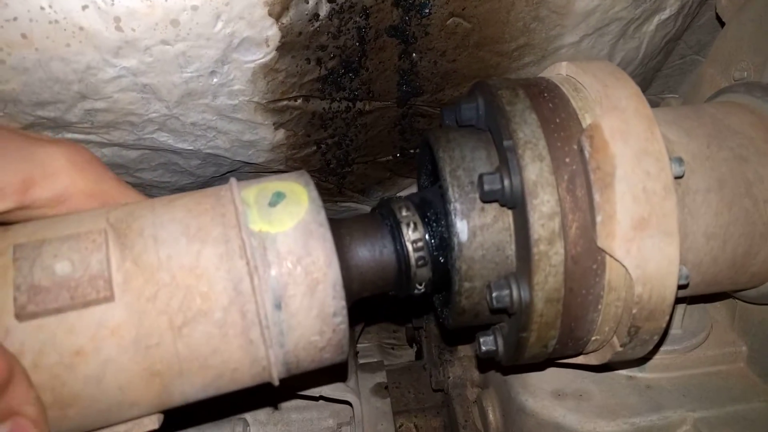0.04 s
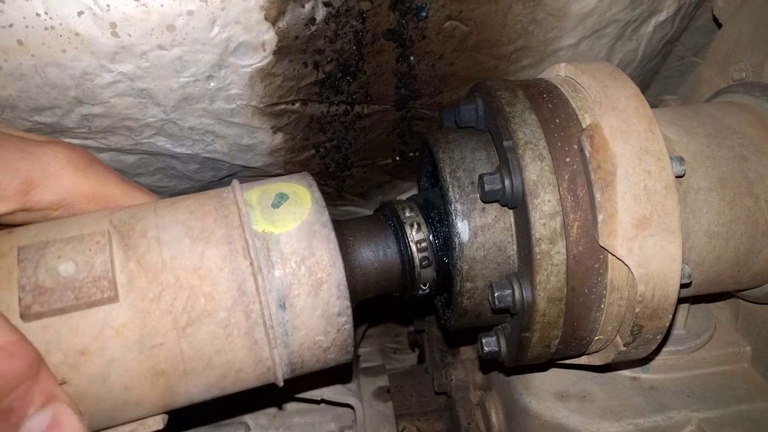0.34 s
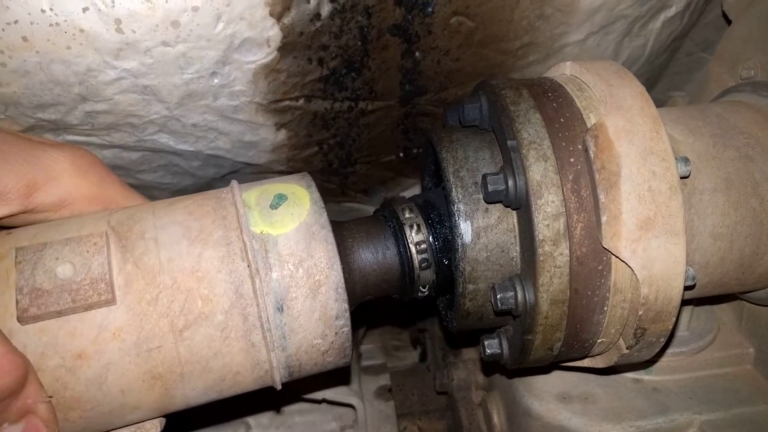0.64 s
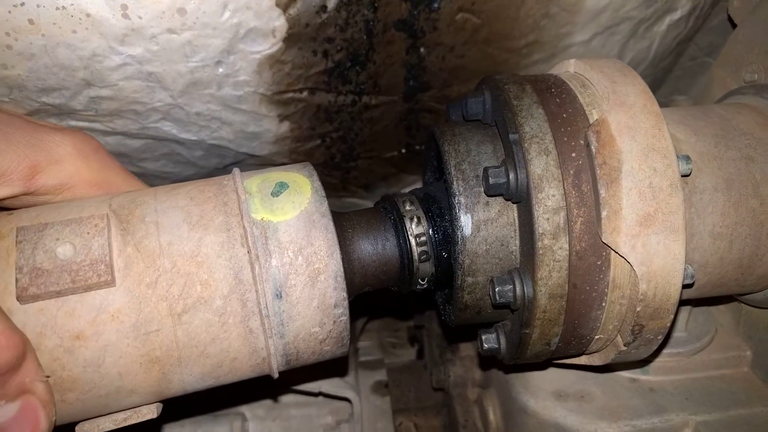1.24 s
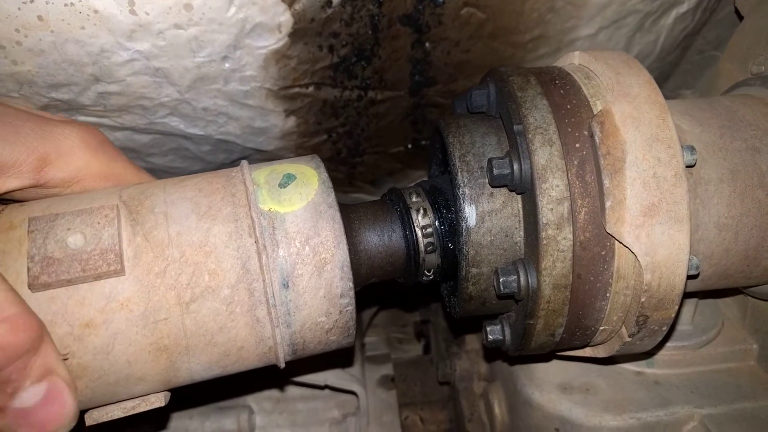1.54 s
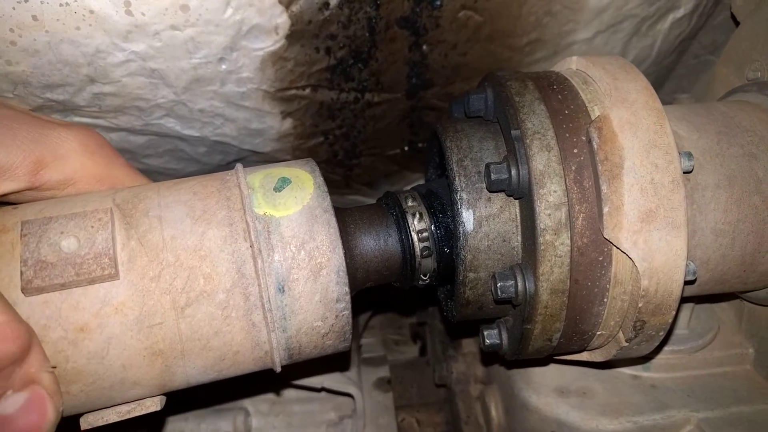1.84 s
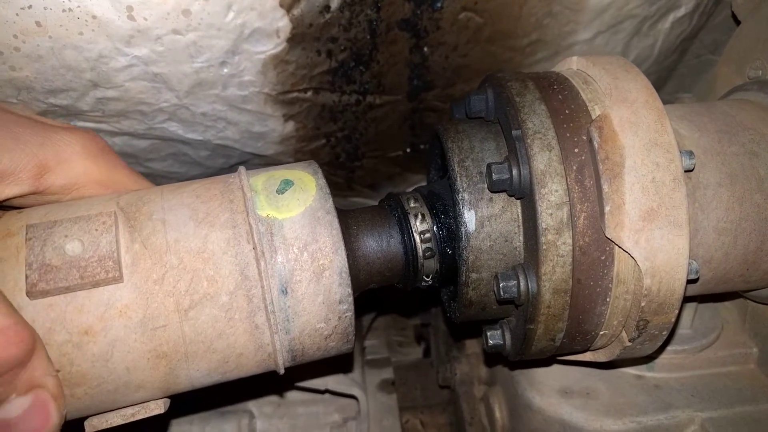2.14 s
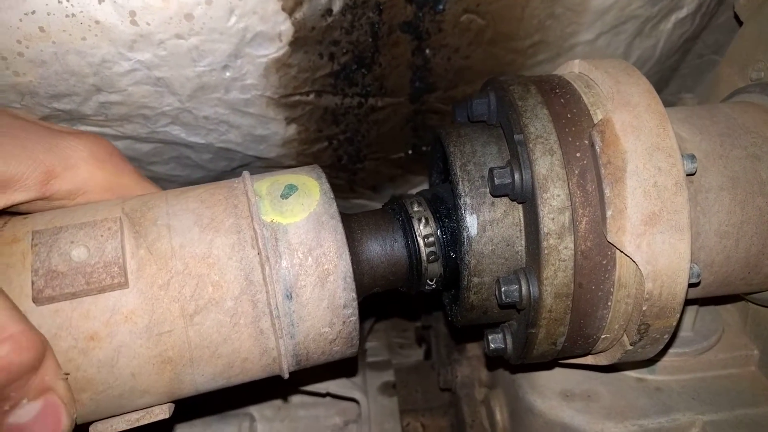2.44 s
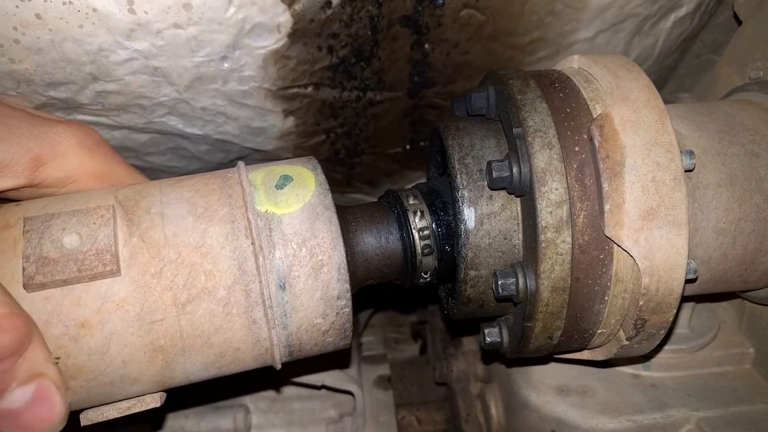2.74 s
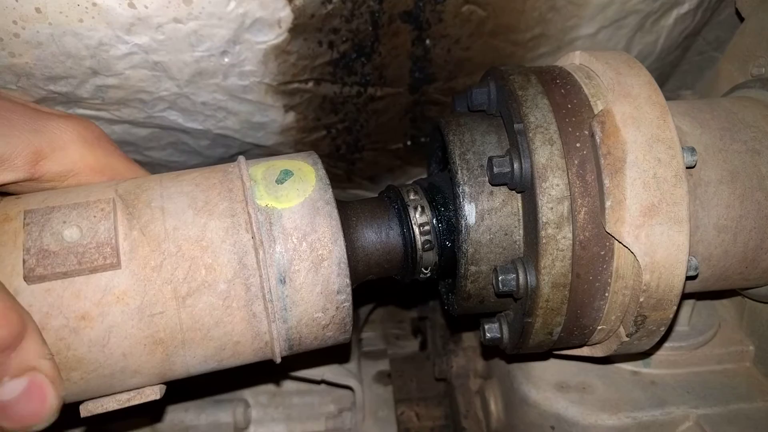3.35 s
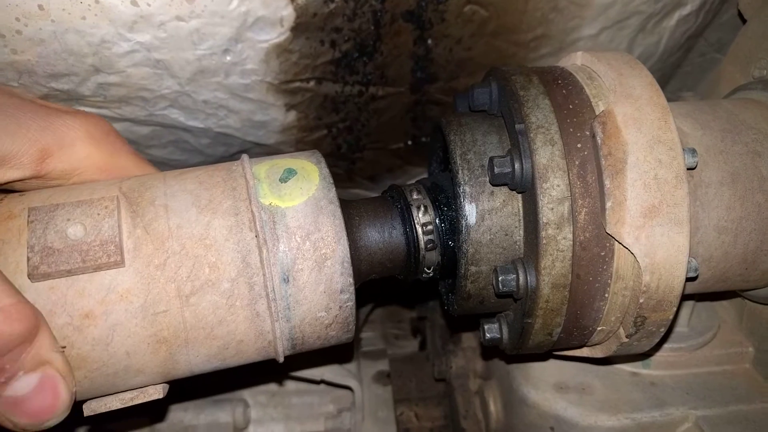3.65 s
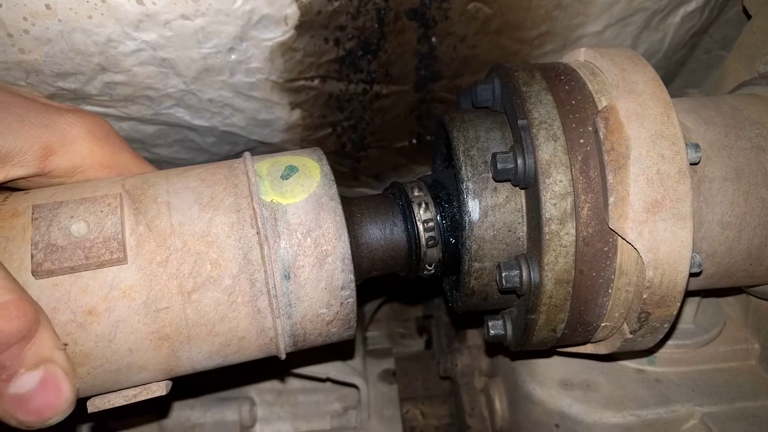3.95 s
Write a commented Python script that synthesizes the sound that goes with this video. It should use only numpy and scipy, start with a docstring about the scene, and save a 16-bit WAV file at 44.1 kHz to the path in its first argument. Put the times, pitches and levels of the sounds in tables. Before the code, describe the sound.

Regular sharp metal clunks and duller bumps from a loose shaft joint rocked under a vehicle.

```python
"""Under a vehicle in a quiet workshop, a low rumble and a soft hiss that swells and ebbs are heard throughout.
A hand pushes a drive shaft: its loose joint knocks free, scrapes through its play (the slack between
its parts) and clunks against the stop with a gritty chatter. On the way back it lands with a dull bump.
The hand rocks it six times; between the blows, skin brushes the tube and grit ticks in the joint."""
import sys
import numpy as np
from scipy import signal
from scipy.fft import rfft, irfft
from scipy.io import wavfile

SR = 44100
rng = np.random.default_rng(int(sys.argv[2]) if len(sys.argv) > 2 else 0)


def bounce(signal):
    """Save signal as a 16-bit WAV file at the path given by the first command-line argument."""
    frames = np.transpose(np.atleast_2d(signal))
    limited = np.clip(frames, -1, 1)
    pcm = np.round(limited * 32767).astype(np.int16)
    wavfile.write(sys.argv[1], SR, pcm)


N = 176400
T = np.arange(N) / SR

# Levels in all tables are relative: the functions add their own gains.
# the joint knocks free: t/s, level/dB, contact time/s, chatter level/dB
FREEING_KNOCKS = [(0.279, -2.5, 0.00013, -13), (0.977, -2, 0.000085, -8.5), (1.6142, -4, 0.00008, -10.5),
                  (2.2364, -2, 0.000048, -3), (2.8554, -3, 0.000065, -9.5), (3.4403, -3, 0.000045, -9)]
# it hits the stop: t/s, level/dB, contact time/s, chatter level/dB, chatter rise time/s
STOP_CLUNKS = [(0.3052, 1.5, 0.0002, 0.5, 0.00087), (1.0015, 0.5, 0.00024, 2.5, 0.00037),
               (1.6430, 1.5, 0.00018, -0.5, 0.0013), (2.2610, 2, 0.0001, -2, 0.0016),
               (2.8880, 2, 0.00011, -1.5, 0.0012), (3.4735, 1, 0.000097, -2.5, 0.0016)]
# it falls back: t/s, level/dB, level of the faint scrape as it settles/dB
RETURN_BUMPS = [(0.713, -10, -32), (1.301, -4.5, -29), (1.908, -2, -30), (2.531, 0, -26), (3.139, 0, -23),
                (3.713, -1, -24.5)]
# tone of the workshop's echoes: f/Hz, level/dB
WORKSHOP_TONE = [(90, -27), (250, -1), (700, -1.5), (1500, -9), (3000, -23), (8000, -21.5), (16000, -16)]
LIGHT_TOP_HZ = 10900  # light contacts are muffled above this


def from_db(db):
    """Turn decibels into a factor to multiply by."""
    return 10 ** (np.asarray(db) / 20)


def rms_one(x):
    """Scale a sound so that its average strength (rms) is 1."""
    return x / np.sqrt(np.mean(x ** 2) + 1e-20)


def keep_band(x, order, hz, kind):
    """Keep the "low", "high" or middle "band" part of a sound; a higher order cuts more steeply."""
    return signal.sosfilt(signal.butter(order, hz, kind, fs=SR, output="sos"), x)


def noise(spectrum, size=N):
    """Noise whose tone follows (f/Hz, level/dB) points and falls away below the first one."""
    hz, db = np.transpose(spectrum)
    bins = np.maximum(np.fft.rfftfreq(size, 1 / SR), 1)
    gain = from_db(np.interp(np.log(bins), np.log(hz), db)) * np.minimum(bins / hz[0], 1) ** 2
    return irfft(rfft(rng.standard_normal(size)) * gain, size)


def resonate(x, hz, width_hz):
    """A resonance: it lets through what lies near one pitch and weakens the rest."""
    r = np.exp(-np.pi * width_hz / SR)
    feedback = [1, -2 * r * np.cos(2 * np.pi * hz / SR), r * r]
    return signal.lfilter(np.array([1, 0, -1]) * (1 - r * r) / 2, feedback, x + 1e-18)


def ring(force, hz, t60):
    """A click starts a pure tone that fades by 60 dB in t60 seconds."""
    r = np.exp(-np.log(1000) / (t60 * SR))
    step = 2 * np.pi * hz / SR
    return signal.lfilter([0, np.sin(step)], [1, -2 * r * np.cos(step), r * r], force + 1e-18)


def burst(s, db, rise_s, fade_s):
    """A loudness curve that builds up to time s and fades after it."""
    distance = np.maximum((s - T) / rise_s, (T - s) / fade_s)
    return from_db(db) * np.exp(-np.minimum(distance, 30))


def echoes(spectrum, t60, build_s):
    """One second of dense echoes that build up and die away."""
    fade = np.exp(-np.log(1000) * T[:SR] / t60) * (1 - np.exp(-(T[:SR] / build_s) ** 2))
    return noise(spectrum, size=SR) * fade / np.sqrt(np.sum(fade ** 2))


def background():
    """A low rumble with a wavering hum, and a hiss that swells and ebbs."""
    # tone of the rumble and of the hiss: f/Hz, level/dB
    rumble_tone = [(25, -39), (33, -21.5), (46, 0), (115, 0.5), (190, -5.5), (300, -12), (480, -21),
                   (700, -20), (1200, -27), (3500, -36.5), (6500, -45.5), (7200, -25.5), (8600, -30),
                   (9800, -36.5), (11500, -37.5), (12800, -35), (15500, -38.5)]
    hiss_tone = [(300, 4.5), (1200, -10.5), (2500, -10.5), (5500, -7), (7200, 0), (8300, 4), (10000, -7),
                 (12000, -15.5), (16000, -17)]
    # the swells of the hiss: t/s, level/dB
    hiss_swells = [(0, -49), (0.08, -54.5), (0.15, -62), (0.25, -66), (0.37, -58), (0.48, -63.5),
                   (0.62, -59), (0.82, -61), (0.96, -68), (1.08, -58), (1.35, -58.5), (1.52, -64.5),
                   (1.72, -63), (1.99, -57), (2.15, -63), (2.47, -61), (2.6, -57), (2.83, -63.2),
                   (3.06, -63), (3.18, -60.5), (3.35, -65), (3.52, -62), (3.9, -65.5)]
    hum_hz, hum_width_hz = 109.4, 29
    low_noise = resonate(rng.standard_normal(N), hum_hz, hum_width_hz)
    hum = from_db(-68.5) * rms_one(resonate(low_noise, hum_hz, hum_width_hz))
    hiss_db = 1 + np.interp(T, *np.transpose(hiss_swells))
    hiss = from_db(hiss_db) * rms_one(noise(hiss_tone))
    rumble = from_db(-49) * rms_one(noise(rumble_tone))
    return rumble + hum + hiss


def workshop():
    """The echoes that the workshop throws back after a click."""
    return echoes(WORKSHOP_TONE, t60=0.89, build_s=0.0016)


def hand():
    """Skin brushes softly over the rusty tube, some strokes brighter than others."""
    # the hand shifts its grip: t/s, level/dB, half-length/s, brightness/(dB per octave)
    strokes = [(1.138, -61, 0.037, 0), (1.807, -62, 0.2, 1.5), (2.578, -61, 0.063, 6),
               (3.668, -59, 0.054, 0.5)]
    # tone of skin on rust: f/Hz, level/dB
    skin_tone = [(700, 11), (1500, 5.5), (3000, -0.5), (4600, -4), (6500, -5), (10000, -14), (16000, -27)]
    out = 0
    for s, db, half_length, tilt in strokes:
        tone = [(hz, level + tilt * np.log2(hz / 3000)) for hz, level in skin_tone]
        swell = np.exp(-np.minimum(((T - s) / half_length) ** 2, 20))
        out = out + from_db(db) * swell * rms_one(noise(tone))
    return out


def grind(pressure):
    """Tiny steel-on-steel contacts ring the joint, louder with more pressure."""
    # resonances of the steel joint: f/Hz, width/Hz, level/dB
    resonances = [(2690, 370, 2.5), (3580, 190, 0.5), (4190, 360, 4.5), (4810, 280, 5), (5400, 330, 0),
                  (6000, 310, 2.5), (7000, 480, 7), (7330, 220, 0), (7750, 185, 13.5), (8140, 110, 13),
                  (9200, 990, 0), (10200, 240, -6), (12200, 240, -15), (15000, 1400, -17)]
    grains_per_s = 6000
    touches = rng.random(N) < grains_per_s / SR
    grains = touches * rng.choice([-1, 1], N) * rng.uniform(0.63, 1, N)
    forces = np.array([grains, grains * pressure])
    steady, pressed = sum(from_db(db) * resonate(forces, hz, width) for hz, width, db in resonances)
    return pressed / steady.std()  # strength 1 at pressure 1


def ticks():
    """Grit shifts in the joint with a thin tick."""
    # ticks between the blows: t/s, level/dB
    grit_shifts = [(0.925, -49.5), (1.068, -45.5), (2.303, -49.5)]
    pressure = sum(burst(s, db, rise_s=0.0076, fade_s=0.008) for s, db in grit_shifts)
    thin = keep_band(grind(pressure), 2, 6650, "high")
    return keep_band(thin, 8, LIGHT_TOP_HZ, "low")


def scrape():
    """The joint slips abruptly through its play, and faintly again as it settles back."""
    # slips between knock and clunk: t/s, level/dB, upper edge of the sound/Hz
    slips = [(0.2952, -7.5, 6360), (0.9950, -12, 6550), (1.6389, -4.5, 9000), (2.2554, -6, 7850),
             (2.8757, -7, 7500), (3.459, -6.5, 5150)]
    low_hz, settle_top_hz, settle_lag_s = 2660, 6150, 0.015
    slipping = 0
    for s, db, top_hz in slips:
        pressure = burst(s, db, rise_s=0.00075, fade_s=0.0049)
        slipping = slipping + keep_band(grind(pressure), 2, [low_hz, top_hz], "band")
    pressure = sum(burst(s + settle_lag_s, db, rise_s=0.0077, fade_s=0.015) for s, _, db in RETURN_BUMPS)
    settling = keep_band(grind(pressure), 2, [low_hz, settle_top_hz], "band")
    return from_db(-26) * slipping + from_db(-25.5) * settling


def chatter():
    """The joint's parts rattle at each knock and clunk, brightest in a short, hard hit on the stop."""
    knock_rise_s, fade_s, dulling_s = 0.00022, 0.0052, 0.00055
    freeing = grind(sum(burst(s, db, knock_rise_s, fade_s) for s, _, _, db in FREEING_KNOCKS))
    stopping = grind(sum(burst(s, db, rise_s, fade_s) for s, _, _, db, rise_s in STOP_CLUNKS))
    out = keep_band(freeing, 8, LIGHT_TOP_HZ, "low")
    for s, _, contact_s, _, _ in STOP_CLUNKS:
        this_hit = stopping * (np.abs(T - s) < 0.2) + 1e-18
        top_hz = 18400 * np.exp(-contact_s / dulling_s)
        out = out + keep_band(this_hit, 8, top_hz, "low")
    return from_db(-31.5) * out


def blow(direct, s, db, contact_s, ring_db):
    """One hit, duller for a longer contact: its direct sound, the shaft's ringing and the echoes."""
    # the tones the shaft rings with: f/Hz, level/dB, time to fade by 60 dB/s
    shaft_tones = [(104.5, -40.5, 0.68), (137.2, -39, 0.3), (180.6, -48, 0.5), (251.4, -42.5, 0.33),
                   (268, -44.5, 0.45), (327.8, -40, 0.12), (418.2, -40.5, 0.15), (486, -48, 0.078),
                   (534.4, -46, 0.12), (610, -45.5, 0.17), (656, -50.5, 0.57), (721, -53, 0.48),
                   (761, -51.5, 0.24), (899, -46, 0.14), (1022, -44.5, 0.13), (1100, -40.5, 0.025),
                   (1298, -48.5, 0.068), (1642, -37.5, 0.059), (2366, -29.5, 0.027), (3104, -30, 0.034),
                   (3840, -33, 0.025)]
    # tone of the echoes from the vehicle's underside: f/Hz, level/dB
    underbody_tone = [(90, -35), (150, 7.5), (300, 7), (450, 7), (700, 0.5), (1200, 2.5), (2000, -4),
                      (5000, -12), (16000, -28)]
    spread_db = 2  # each hit rings the tones a little differently
    click = signal.unit_impulse(SR)
    ringing = sum((-1) ** k * from_db(level + spread_db * rng.normal()) * ring(click, hz, t60)
                  for k, (hz, level, t60) in enumerate(shaft_tones))
    underbody = from_db(-1) * echoes(underbody_tone, t60=0.14, build_s=0.0023)
    response = direct + from_db(ring_db) * (ringing + underbody + workshop())
    half = SR // 200
    pulse = np.exp(-.5 * (np.arange(-half, half) / SR / contact_s) ** 2)  # a bell-shaped push
    sound = signal.fftconvolve(response, -from_db(db) * pulse / pulse.sum())
    return np.pad(sound, (int(s * SR) - half, N))[:N]


def shaft():
    """Sharp knocks, heavy clunks and dull bumps ring the same shaft, each with its own direct sound."""
    # the short clack of the coupling's flange (its rim) and bolts: f/Hz, level/dB
    flange_tone = [(700, -15), (1100, -1.5), (1750, -7), (2350, 1), (3000, 0.5), (3900, -5), (5000, -5),
                   (16000, -28)]
    click = signal.unit_impulse(SR)
    clack = from_db(0.5) * echoes(flange_tone, t60=0.023, build_s=0.00033)
    crack = from_db(6.5) * resonate(click, hz=445, width_hz=570)
    clank = from_db(10) * resonate(click, hz=1100, width_hz=324)
    thud = from_db(1.5) * resonate(click, hz=111, width_hz=70)
    bump = from_db(10) * resonate(click, hz=317, width_hz=95)
    knocks = sum(blow(crack + clack, s, db, contact_s, ring_db=-0.5)
                 for s, db, contact_s, _ in FREEING_KNOCKS)
    clunks = sum(blow(clank + thud + clack, s, db, contact_s, ring_db=-0.87)
                 for s, db, contact_s, _, _ in STOP_CLUNKS)
    bumps = sum(blow(bump + clack, s, db, contact_s=0.0003, ring_db=-8.5) for s, db, _ in RETURN_BUMPS)
    return keep_band(knocks + clunks + bumps, 3, 52, "high")


def scene():
    """The joint close by, the workshop around it."""
    rattle = chatter() + scrape() + ticks()
    rattle_echoes = from_db(6.5) * signal.fftconvolve(rattle, workshop())[:N]
    return (shaft() + rattle + rattle_echoes + hand() + background())[None]


def record(dry):
    """The sharpest peaks are rounded a little and the highest treble is cut steeply."""
    peak_limit, cutoff_hz = 0.96, 15900
    rounded = peak_limit * np.tanh(dry / peak_limit)
    return signal.sosfilt(signal.ellip(12, .1, 80, cutoff_hz, fs=SR, output="sos"), rounded)


dry = scene()
out = record(dry)
bounce(out)
```